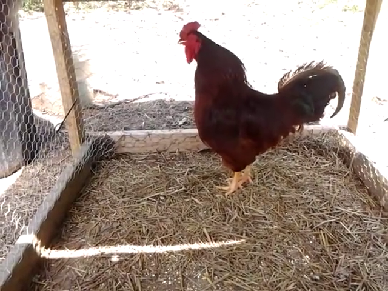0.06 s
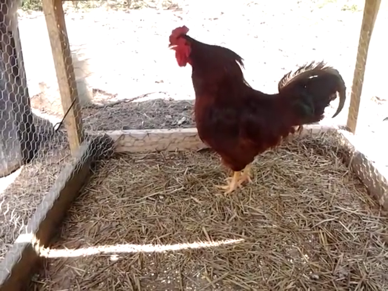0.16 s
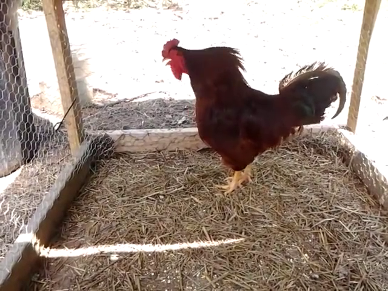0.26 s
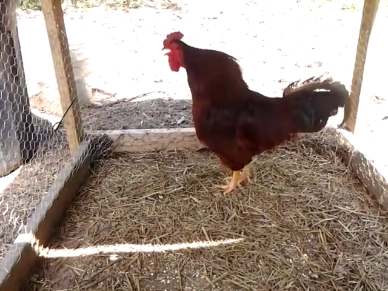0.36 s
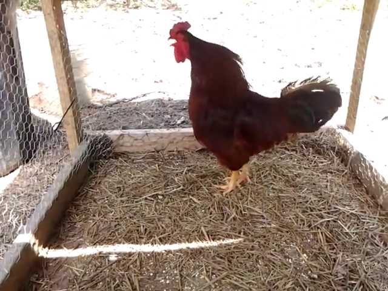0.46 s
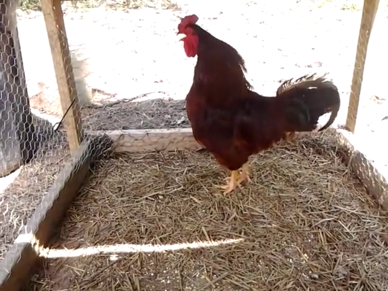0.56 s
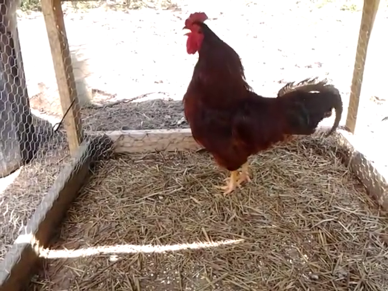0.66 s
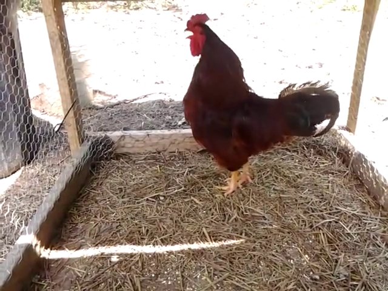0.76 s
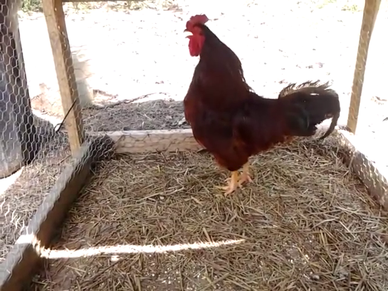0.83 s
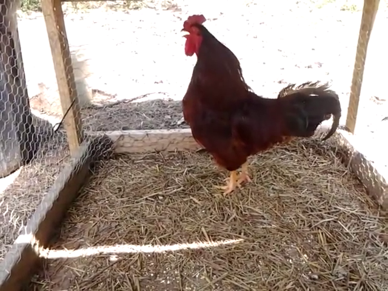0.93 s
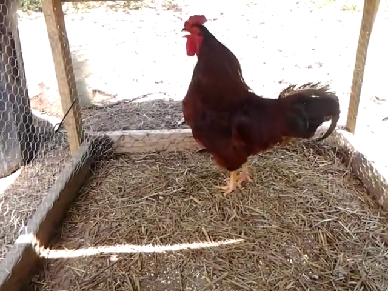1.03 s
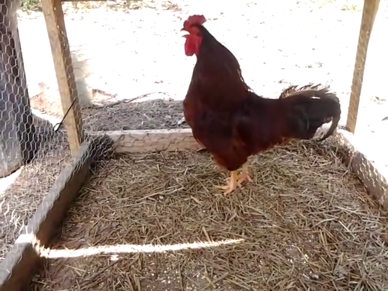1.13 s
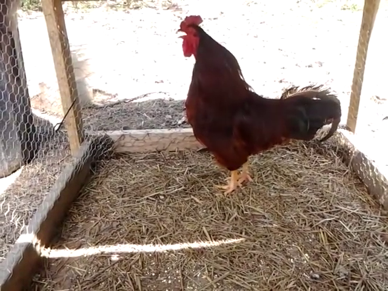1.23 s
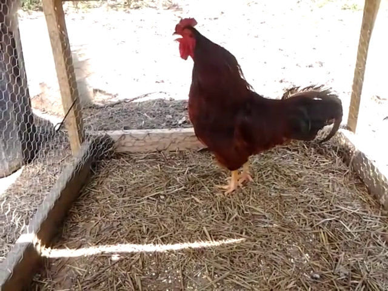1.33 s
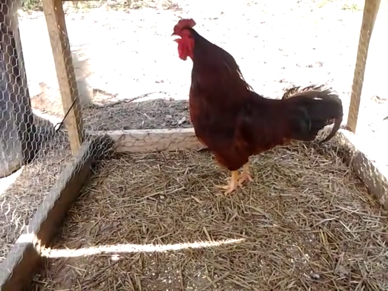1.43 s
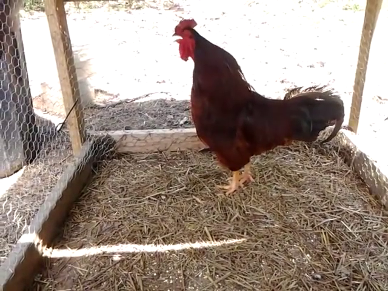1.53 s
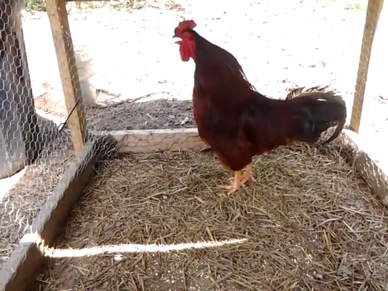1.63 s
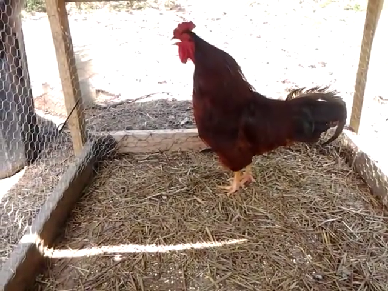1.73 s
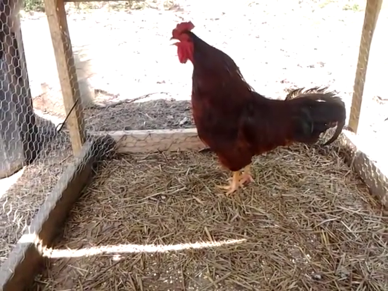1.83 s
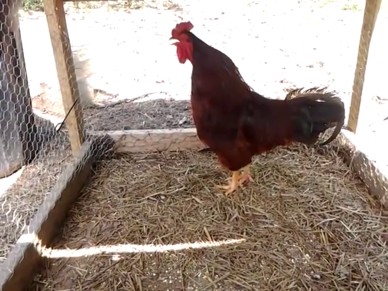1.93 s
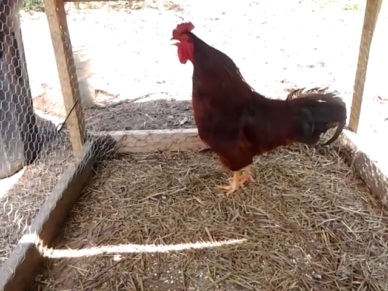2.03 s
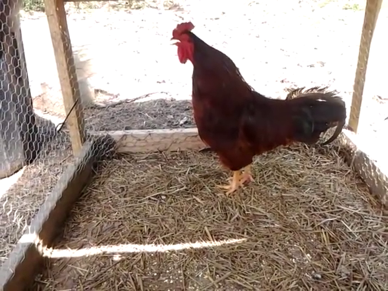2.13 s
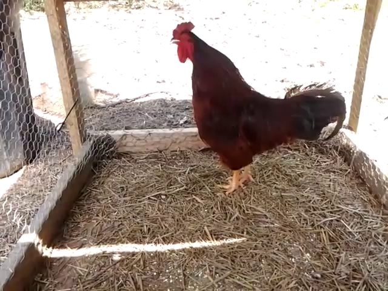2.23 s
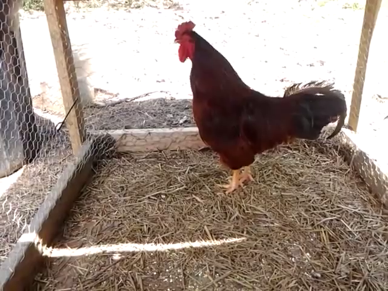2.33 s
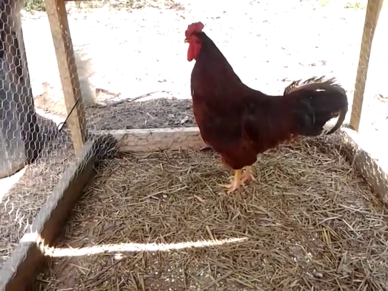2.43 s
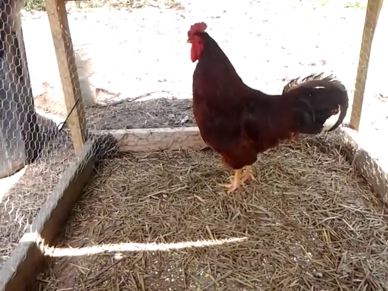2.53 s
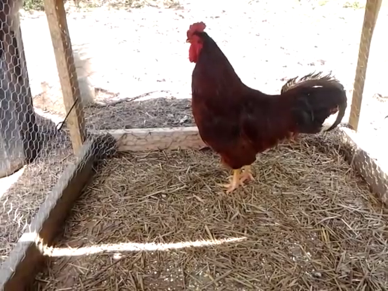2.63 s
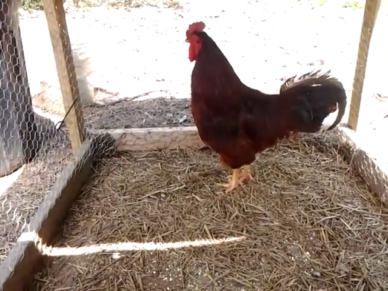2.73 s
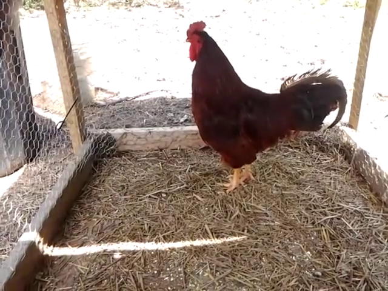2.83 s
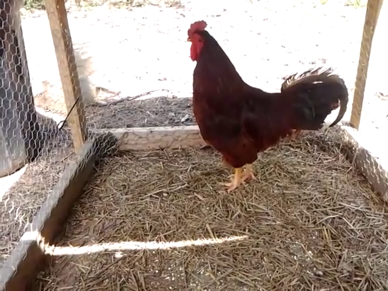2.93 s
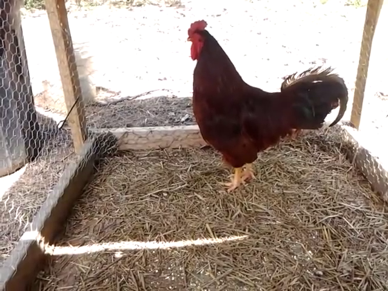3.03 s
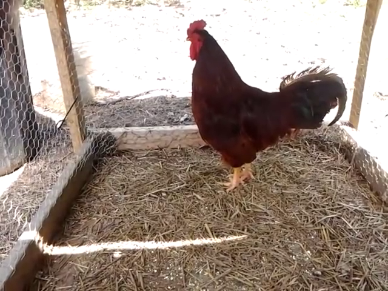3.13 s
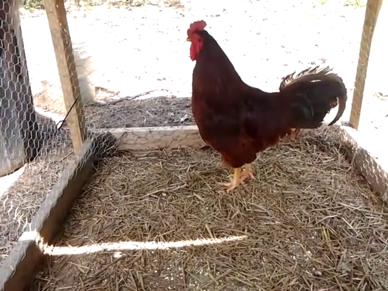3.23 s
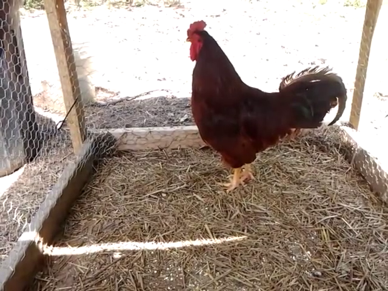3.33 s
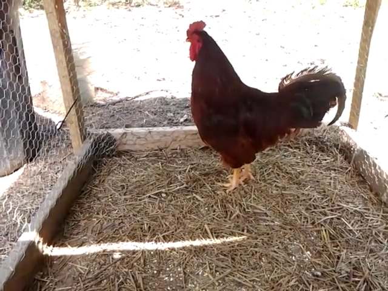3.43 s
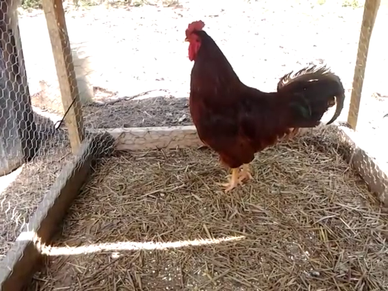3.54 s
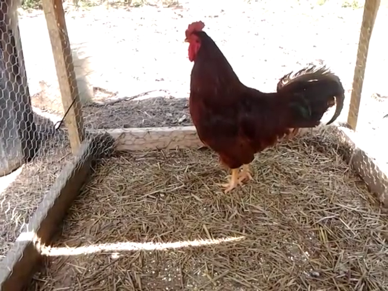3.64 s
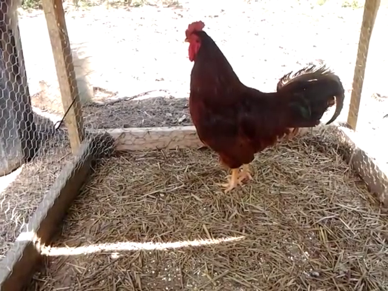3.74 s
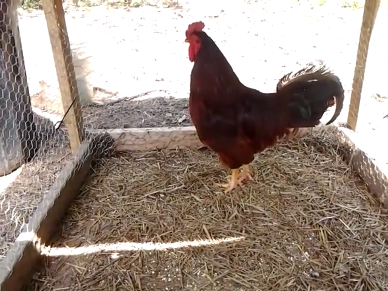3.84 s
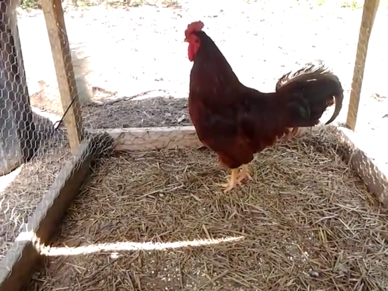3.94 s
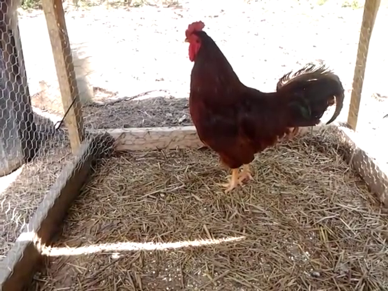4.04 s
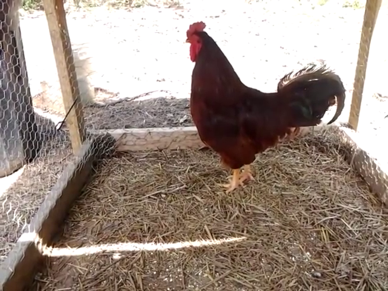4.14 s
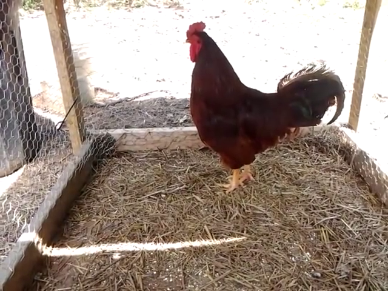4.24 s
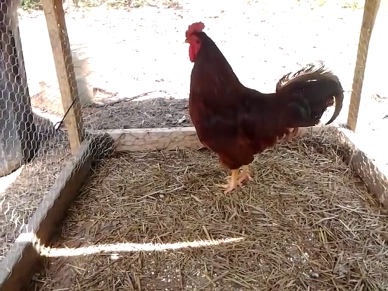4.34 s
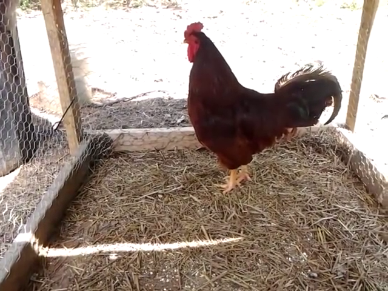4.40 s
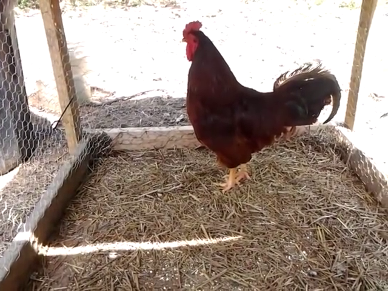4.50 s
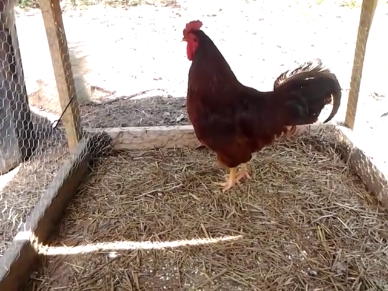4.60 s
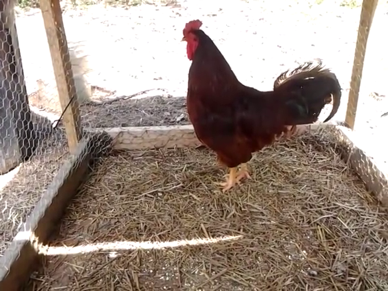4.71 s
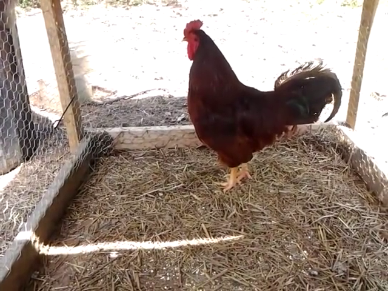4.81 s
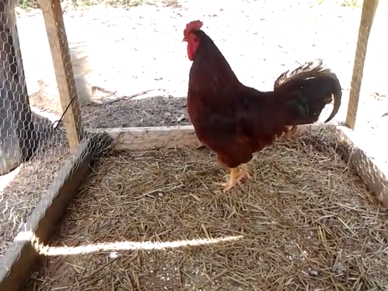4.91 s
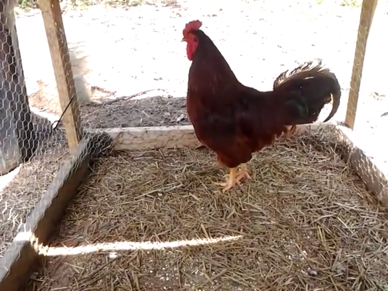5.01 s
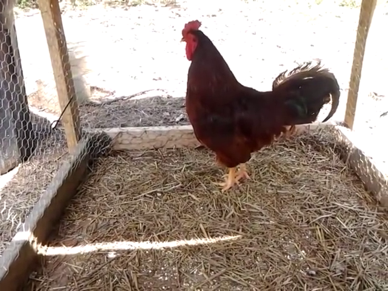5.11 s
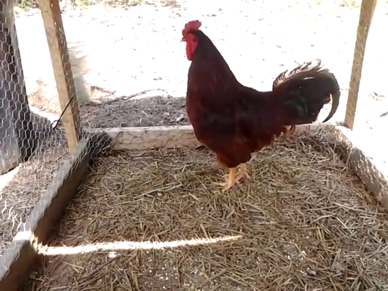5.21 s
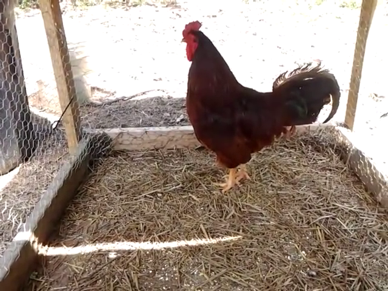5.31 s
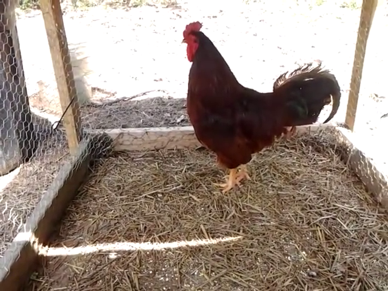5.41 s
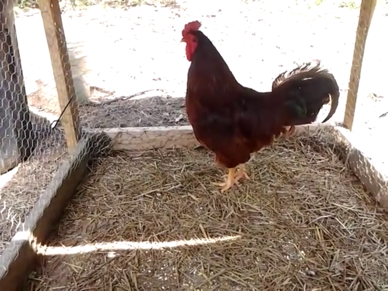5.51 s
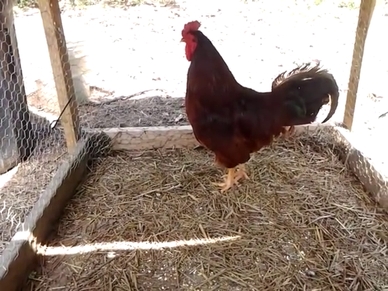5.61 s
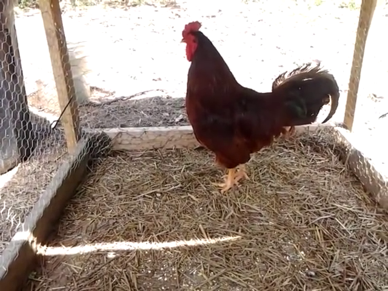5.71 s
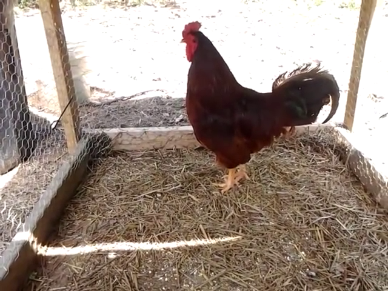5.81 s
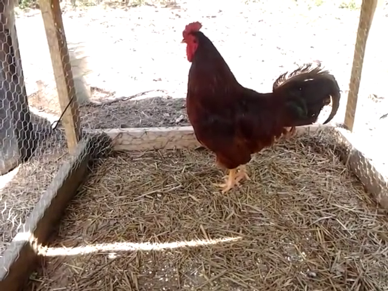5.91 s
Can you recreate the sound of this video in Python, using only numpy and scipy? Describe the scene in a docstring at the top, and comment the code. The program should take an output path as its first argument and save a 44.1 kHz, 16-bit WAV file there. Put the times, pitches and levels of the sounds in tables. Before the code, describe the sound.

Close, nearly dry outdoor pickup of a single rooster crow, cracking and raspy, with slight reflections from the wooden pen and yard. Straw ticks lead in; the crow fills the first two seconds or so. What remains is much quieter: airy hush with low rumble, thin bird chips, sliding whistles, buzzes and squeaks, occasional low clucks, and three distant nasal calls late on.

```python
"""Over outdoor hush, ticks of straw and a soft cluck lead into one close rooster crow, from pulses in a moving throat.
He crows a short note, a rising note, a fast warble and a long falling note, cracking between clean,
period-doubled and irregular vibration; filtered noise echoes make pen and yard ring faintly behind him.
Small birds, gliding near-sines, chip from the first note on, then whistle, buzz and squeak.
More soft clucks are scattered to the end, and late on a harmonic jay-like voice calls three times far off."""
import sys
import numpy as np
from scipy import signal
from scipy.fft import rfft, irfft
from scipy.io import wavfile
from scipy.ndimage import uniform_filter1d

SR = 44100
rng = np.random.default_rng(int(sys.argv[2]) if len(sys.argv) > 2 else 0)


def int16_out(signal):
    """Quantize to a 16-bit WAV file."""
    q = np.round(np.clip(np.atleast_2d(signal).T, -1, 1) * 32767)
    wavfile.write(sys.argv[1], SR, q.astype(np.int16))


N = 262836


def gain_of(db):
    """Decibels to a factor."""
    return 10 ** (np.asarray(db) / 20)


def evened(x):
    """Scales to an rms of one."""
    return x / np.sqrt(np.mean(x ** 2) + 1e-20)


def levelled(x):
    """Holds the short-time rms at one."""
    return x / np.sqrt(abs(uniform_filter1d(x ** 2, size=1365)) + 1e-12)


def eased(x, length_s):
    """Rounds the steps of a control."""
    return uniform_filter1d(x * 1., size=max(round(length_s * SR), 1))


def read(points, hz):
    """Reads a spectrum table on a log-frequency axis."""
    f, value = np.transpose(points)
    return np.interp(np.log(hz + 1), np.log(f + 1), value)


def follow(rows, t):
    """Reads each column of a curve table at the times t."""
    s, *columns = np.transpose(rows)
    return [np.interp(t, s, c) for c in columns]


def add(mix, s, sound):
    """Lays a sound into the mix at time s."""
    part = mix[max(round(s * SR), 0):][:len(sound)]
    part += sound[:len(part)]


def band(x, low_hz, high_hz):
    """A steep band-pass."""
    hz = np.fft.rfftfreq(2 * len(x), 1 / SR) + 0.000872  # the offset avoids dividing by zero
    spectrum = rfft(x, 2 * len(x))
    return irfft(spectrum / (1 + (low_hz / hz) ** 20) / (1 + (hz / high_hz) ** 20))[:len(x)]


def wobble(size, hz):
    """Smooth random drift, up to about hz, of rms one over the whole scene."""
    low_pass = signal.butter(2, hz, fs=SR, output="sos")
    return evened(signal.sosfilt(low_pass, rng.standard_normal(N)))[:size]


def resonate(x, modes, steep=1.38, size=4096):
    """A causal filter made of steep-sided resonances."""
    hz = abs(np.fft.fftfreq(size, 1 / SR))
    gain = sum(gain_of(db) / (1 + ((hz - f) / width * 1.82) ** 2) ** steep for f, width, db in modes)
    # the phase that belongs to this gain makes the ring start at once
    ring = np.fft.ifft(np.exp(signal.hilbert(np.log(gain + 1e-5)).conj())).real
    return signal.oaconvolve(x, ring[:size // 2])[:len(x)]


def echoes(x, decay, delay_s):
    """Scattered reflections: a noise tail in which each band dies at its own speed."""
    hz, t, z = signal.stft(rng.standard_normal(SR), SR, nperseg=256)
    fall = gain_of(-60 * t / read(decay, hz)[:, None])
    tail = signal.istft(z * fall, SR, nperseg=256)[1]
    out = np.zeros(N)
    add(out, delay_s, signal.fftconvolve(x, tail / np.linalg.norm(tail))[:N])
    return out


def glide(length, start_hz, end_hz, jitter, bend):
    """Phase and soft envelope of one gliding call."""
    size = max(round(length * SR), 64)
    hz = start_hz + (end_hz - start_hz) * np.linspace(0, 1, size) ** bend
    phase = 2 * np.pi * np.cumsum(hz * (1 + jitter * wobble(size, 200))) / SR
    return phase, signal.windows.tukey(size, .5)


# colour of the outdoor bed: (f/Hz, relative level/dB per Hz)
AIR = [(25, -23), (60, -18.5), (120, -9.5), (200, -6.5), (320, -8.5), (600, -10.5), (1300, -13.5),
       (2200, -13.5), (3900, -15.5), (5200, -18), (6500, -21), (8700, -10), (10800, -17), (17000, -13)]
AIR_DB = -57.5  # rms before the rumble's drift


def air():
    """Steady outdoor hush and microphone hiss from shaped noise; its low rumble drifts."""
    colour = gain_of(read(AIR, np.fft.rfftfreq(N, 1 / SR)))
    hush = evened(irfft(rfft(rng.standard_normal(N)) * colour, N))
    rumble = band(hush, 0, 400)
    return gain_of(AIR_DB) * (hush + 0.2027 * wobble(N, 4) * rumble)


# far harsh calls: (t/s, length/s, top f/Hz, level/dB before the distance trim)
JAY = [(4.305, .22, 828, -40), (5.057, 0.23, 826, -37), (5.759, 0.232, 839, -38.5)]
# their harmonic colour: (f/Hz, relative level/dB)
JAY_COLOUR = [(800, -18), (1600, 1.5), (2400, 5), (3200, 1.5), (4000, -5.5), (4900, -5), (5700, -30),
              (7500, -24), (9600, -7.5), (11000, -18)]


def jay(jitter=0.028, rasp=0.38, count=13):
    """A harsh nasal jay-like call of shaky harmonics: the pitch leaps up, then sinks."""
    out = np.zeros(N)
    for s, length, top_hz, db in JAY:
        u = np.linspace(0, 1, round(length * SR))
        arch = np.interp(u, [0, .2, 1], [.94, 1, .92])
        phase = 2 * np.pi * np.cumsum(top_hz * arch * (1 + jitter * wobble(len(u), 330))) / SR
        call = sum(gain_of(read(JAY_COLOUR, k * top_hz)) * np.sin(k * phase) for k in range(1, count + 1))
        swell = signal.windows.tukey(len(u), .4) * (1 + rasp * wobble(len(u), 190))
        add(out, s, gain_of(db) * evened(swell * call))
    return out


def chirp(length, start_hz, end_hz, db, rough):
    """One near-sine call; pitch jitter makes a rough one buzz."""
    phase, swell = glide(length, start_hz, end_hz, jitter=.1 * rough, bend=1.7)
    return gain_of(db) * evened(swell * np.sin(phase))


# All small-bird levels are rms before the distance trim.
# a small bird's falling chips: (t/s, length/s, top f/Hz, level/dB)
CHIPS = [(0.324, 0.051, 4030, -52), (2.357, .042, 4817, -56), (2.487, 0.033, 4760, -58),
         (2.614, 0.026, 4526, -56), (3.072, .041, 4840, -63), (3.423, 0.026, 4600, -63),
         (3.475, .035, 4750, -64.5), (3.609, 0.0209, 4500, -61.5), (3.672, 0.046, 4150, -65),
         (3.775, 0.04, 4540, -62), (4.186, .03, 4660, -60), (4.3, 0.027, 4710, -61)]
CHIP_FALL, CHIP_ROUGH = .75, 0.097  # end pitch as a share of the top; roughness 0-1
# fainter chips of its flock, at loosely spaced times; length and pitch are averages
FAINT_FROM_S, FAINT_TO_S, FAINT_S, FAINT_HZ, FAINT_DB = 2.9, 3.9, .045, 4250, -66
# two-note whistles, high then sliding down:
# (t/s, delay of second note/s, top f/Hz, first note level/dB, second note level/dB)
WHISTLES = [(2.358, 0.076, 2680, -51.5, -52.5), (2.695, .051, 2700, -54, -45.5),
            (2.993, .057, 2607, -52.5, -50.5)]
# first note's end, second note's start and end as shares of the top pitch
WHISTLE_SAG, WHISTLE_STEP, WHISTLE_END = .97, .83, .72
WHISTLE_S, WHISTLE_ROUGH = .056, 0.2  # length of each note; roughness 0-1
# buzzes: (t/s, level/dB)
BUZZES = [(2.462, -58), (4.418, -56.5)]
BUZZ_S, BUZZ_HZ, BUZZ_ROUGH = 0.14, 3580, 0.81
TONE_AFTER_S, TONE_HZ, TONE_DB = .058, 4175, -4.5  # a thin tone joins; level relative to the buzz
# level squeaks: (t/s, length/s, f/Hz, level/dB, roughness 0-1)
SQUEAKS = [(4.691, 0.089, 1960, -56.5, 0.58), (4.902, 0.036, 3030, -55.5, 0.39),
           (4.924, 0.032, 3990, -54.5, .18), (4.973, 0.019, 3920, -46, 0.85),
           (5.053, 0.029, 3155, -51.5, 0.07)]


def small_birds(count=4):
    """Small voices as gliding near-sines: falling chips, two-note whistles, buzzes and squeaks."""
    out = np.zeros(N)
    faint = []
    for k, (when, span, pitch) in enumerate(rng.random((count, 3))):
        s = FAINT_FROM_S + (FAINT_TO_S - FAINT_FROM_S) * (k + when) / count
        faint.append((s, FAINT_S * (.5 + span), FAINT_HZ * (1 + .2 * (pitch - .5)), FAINT_DB))
    for s, length, hz, db in CHIPS + faint:
        add(out, s, chirp(length, hz, hz * CHIP_FALL, db, CHIP_ROUGH))
    for s, delay, hz, first_db, second_db in WHISTLES:
        add(out, s, chirp(WHISTLE_S, hz, hz * WHISTLE_SAG, first_db, WHISTLE_ROUGH))
        second = chirp(WHISTLE_S, hz * WHISTLE_STEP, hz * WHISTLE_END, second_db, WHISTLE_ROUGH)
        add(out, s + delay, second)
    for s, db in BUZZES:
        add(out, s, chirp(BUZZ_S, BUZZ_HZ, BUZZ_HZ, db, BUZZ_ROUGH))
        add(out, s + TONE_AFTER_S, chirp(BUZZ_S, TONE_HZ, TONE_HZ, db + TONE_DB, CHIP_ROUGH))
    for s, length, hz, db, rough in SQUEAKS:
        add(out, s, chirp(length, hz, hz, db, rough))
    return out


# soft clucks: (t/s, length/s, start f/Hz, end f/Hz, rms level/dB)
CLUCKS = [(0.242, 0.041, 1195, 1040, -62.5), (2.584, 0.05, 786, 878, -56.5), (4.745, 0.057, 763, 817, -70),
          (5.498, 0.067, 766, 907, -65)]
# ticks of dry straw: (t/s, peak level/dB)
TICKS = [(0.1315, -45.5), (0.2493, -41.5), (0.267, -35.5), (0.2992, -34.5)]
# straw resonances: (f/Hz, nominal width/Hz, relative level/dB)
TICK_MODES = [(4000, 2700, -19.5), (9500, 820, -0.5), (11500, 3000, -14)]


def pen():
    """Clucks as short two-harmonic glides; straw underfoot as resonant noise ticks."""
    out = np.zeros(N)
    for s, length, start_hz, end_hz, db in CLUCKS:
        phase, swell = glide(length, start_hz, end_hz, jitter=.05, bend=1)
        add(out, s, gain_of(db) * evened(swell * (np.sin(phase) + .3 * np.sin(2 * phase))))
    t = np.arange(SR // 40) / SR
    for s, db in TICKS:
        burst = rng.standard_normal(len(t)) * gain_of(-60 * t / 0.01)  # falls 60 dB in 10 ms
        tick = resonate(burst, TICK_MODES)
        add(out, s, gain_of(db) * tick / abs(tick).max())
    return out


def pulse_train(phase, count=27):
    """Each pulse is spread over its cycle; the upper overtones swell and sink as the beak moves."""
    spread, drift_db, drift_hz = .19, 3.5, 6
    out = 0
    for k in range(1, count + 1):
        reach = np.clip((k - 2) / 6, 0, 1)  # the two lowest harmonics stay steady
        drift = gain_of(drift_db * reach * wobble(len(phase), drift_hz))
        out = out + drift * np.cos(k * phase - spread * k ** 2)
    return evened(out)


# fast warble of the syrinx in the third note; WARBLE_DIP_S times one of its dips
WARBLE_FROM_S, WARBLE_TO_S, WARBLE_RAMP_S = .915, 1.295, .03
WARBLE_HZ, WARBLE_DIP_S = 32.3, .942
WARBLE_DEPTH = .068  # scales the two parts of the pitch swing
# a rattle, faster than the warble but lower than the voice's pitch, shakes the pulses:
# rate, shift in cycles, pitch jitter
RATTLE_HZ, RATTLE_TURNS, RATTLE_JITTER = 169.2, .03, .12


def syrinx(t, hz, doubling, rough, jitter=0.079, shimmer=1.0, skew=0.038, crack=0.33, sag=.05, throb=0.37,
           waver=0.0017):
    """Pulses, alternately strong and weak when the period doubles, irregular when rough."""
    warbling = np.clip(np.minimum(t - WARBLE_FROM_S, WARBLE_TO_S - t) / WARBLE_RAMP_S, 0, 1)
    swing = 2 * np.pi * WARBLE_HZ * (t - WARBLE_DIP_S)
    # the voice cracks, sags and weakens near the bottom of each swing
    dip = warbling * ((1 + np.cos(swing)) / 2) ** 4
    rough = np.clip(rough + crack * dip, 0, 1)
    pitch_swing = WARBLE_DEPTH * warbling * (0.67 * np.cos(swing) + 0.32 * np.sin(swing))
    hz = hz * (1 - sag * dip - pitch_swing)
    unsteady = 1 + jitter * rough * wobble(len(t), 350) + waver * wobble(len(t), 42)
    turns = np.cumsum(hz * unsteady) / SR
    alternate = doubling * np.cos(np.pi * turns)
    rattle_turns = np.cumsum(RATTLE_HZ * (1 + RATTLE_JITTER * wobble(len(t), 200))) / SR
    rattle = warbling * np.sin(2 * np.pi * rattle_turns)
    # every other pulse also comes early
    phase = 2 * np.pi * (turns + skew * alternate + RATTLE_TURNS * rattle)
    pulses = pulse_train(phase) * (1 + 0.36 * alternate + shimmer * rough * wobble(len(t), 300))
    puffs = (1 + np.cos(phase)) * rng.standard_normal(len(t))  # air escapes once a cycle
    return (pulses * (1 - 0.71 * rough) + .5 * rough * puffs) * (1 - throb * dip)


# throat and beak resonances in four postures: (f/Hz, nominal width/Hz, relative level/dB)
THROAT_SHORT = [(550, 164, -9), (1113, 140, 0), (1336, 300, 1), (1745, 190, -2), (3000, 660, -28.5),
                (3920, 240, -12), (4800, 480, -17.5), (6220, 510, -16), (7200, 400, -24.5),
                (8160, 360, -11), (8630, 550, -13), (10260, 700, -29.5), (12800, 3000, -34),
                (15670, 2000, -46.5)]
THROAT_RAISED = [(750, 200, -1), (1162, 220, 2.5), (1466, 200, 1.5), (1722, 170, -2.5), (1910, 310, -2),
                 (3051, 380, -19.5), (4352, 250, -19.5), (5222, 430, -18.5), (6558, 260, -10.5),
                 (7726, 710, -13), (8340, 310, -14.5), (9906, 1100, -29), (12715, 1700, -29.5),
                 (15400, 1400, -32)]
THROAT_HELD = [(684.5, 280, -6.5), (1130, 250, -7.5), (1365, 160, 3.5), (1700, 530, -17), (2790, 80, -20.5),
               (4226, 670, -26), (4740, 200, -21), (5648, 320, -28.5), (6730, 520, -19), (7330, 300, -23.5),
               (8165, 250, -23), (9050, 530, -11), (10120, 570, -21), (11330, 790, -38), (14400, 4000, -44)]
THROAT_SINKING = [(626.4, 340, -4.5), (1130, 610, -8.5), (1362, 51, 2), (1702, 130, -6.5), (2750, 200, -16),
                  (3763, 250, -14), (4706, 150, -6), (5604, 210, -16.5), (6200, 250, -20.5),
                  (7520, 1800, -21.5), (8720, 600, -13), (9986, 500, -21), (12700, 1300, -37.5),
                  (14800, 2000, -38)]
# how the neck moves: (t/s, posture: 0 short, 1 raised, 2 held, 3 sinking)
POSTURE = [(.58, 0), (.62, 1), (1.29, 1), (1.35, 2), (1.84, 2), (2.02, 3)]


def throat(source):
    """Throat resonances colour the pulses, crossfading from one posture to the next."""
    posture, = follow(POSTURE, np.arange(len(source)) / SR)
    shapes = [THROAT_SHORT, THROAT_RAISED, THROAT_HELD, THROAT_SINKING]
    return sum(np.clip(1 - abs(posture - k), 0, 1) * resonate(source, modes) for k, modes in enumerate(shapes))


# the four notes: (start t/s, let go t/s, fade in dB/s, effort level/dB,
# fundamental level/dB and brightness level/dB relative to effort, brightening in dB/s,
# period doubling 0-1, roughness 0-1, length of the opening catch/s, its added roughness 0-1)
NOTES = [(0.36, 0.506, 472, -9, -11, -4.5, -11.5, .01, 0.056, .058, .75),
         (0.673, 0.843, 261, -8.5, -1.5, -13, 60, 0.078, 0.033, .016, .05),
         (.895, 1.326, 40.4, -12.5, -1.5, -7.5, -6.5, 0.38, 0.095, 0.00075, 0.036),
         (1.327, 2.256, 518.7, -8, -9, -12.5, 3, 0.039, .025, 0.00091, 0)]
# basic pitch of each note, before slackening and warble: (t/s, f/Hz)
SHORT_PITCH = [(.43, 666), (.475, 684), (.55, 664)]
RISING_PITCH = [(0.694, 710), (.731, 744.6), (.74, 812), (.795, 853.4), (0.803, 952.4), (0.842, 973),
                (0.859, 833.8), (0.891, 785.7)]
WARBLING_PITCH = [(.897, 667.6), (.93, 758), (1.081, 774.5), (1.258, 768), (1.288, 822), (1.316, 806.5)]
HELD_PITCH = [(1.338, 700.3), (1.384, 713), (1.438, 702.6), (1.454, 687.6), (1.464, 699.8), (1.752, 680.2),
              (1.992, 656.1), (2.002, 646), (2.165, 628.3)]
# cracks of the voice: (t/s, length/s, added doubling 0-1, added roughness 0-1,
# middle register (mainly the second harmonic) level change/dB, fundamental level change/dB)
CRACKS = [(0.416, 0.0074, 0.1, 0.2, -9.5, -3), (0.731, 0.055, .05, 0.19, -4, 0),
          (0.778, 0.03, 0, 0.07, -4, -7.5), (0.798, 0.098, 0.02, 0.14, 0.5, -5),
          (0.892, .024, 0, .08, -3.5, 4.5), (1.283, .048, .6, 0.13, -4.5, -0.5),
          (1.337, .065, 0, 0.02, -7.5, 2.5), (1.399, 0.13, 0.32, .03, 0, 1.5),
          (2.176, 0.089, 0.18, 0.22, -0.5, -1), (2.239, 0.049, .1, 0.08, 0.5, 4)]
# treble level change, mostly along the long note: (t/s, level/dB)
TREBLE = [(1.33, 0.5), (1.39, 2), (1.5, -2.5), (1.68, 3), (1.8, -0.5), (2, 1), (2.22, 1)]
ATTACK_S, SWITCH_S = 0.0061, .01  # a note swells in; the syrinx flips from one kind of vibration to another
# at the catch and after letting go the syrinx is slack: lower, period-doubled and rough
SLACK_PITCH, SLACK_DOUBLING, SLACK_DB = .85, 0.42, -1.5
FADE_ROUGH, FADE_DULL_DB = .45, -9
# above this pitch the fundamental leaves the throat's lowest resonance
LEAVE_HZ, LEAVE_DB_PER_HZ = 817, -0.08
# late in the long note he tires: the middle register drops and a period-doubled rasp grows
TIRE_AT_S, TIRE_DROP_S, TIRE_MIDDLE_DB = 1.955, 0.037, -7
TIRE_GROW_S, TIRE_DOUBLING = 0.13, 0.55


def gesture(t):
    """Pitch, doubling, roughness and three register gains, from the notes, their cracks and his tiring."""
    which = np.maximum(np.searchsorted([row[0] for row in NOTES], t) - 1, 0)
    (start, stop, fade, effort_db, fundamental_db, bright_db, brightening,
     doubling, rough, catch_s, catch_rough) = np.array(NOTES)[which].T
    catch = eased(t < start + catch_s, SWITCH_S)
    fading = eased(t > stop, SWITCH_S)
    slack = np.minimum(catch + fading, 1)
    tired_s = np.maximum(t - TIRE_AT_S, 0)
    crack_doubling, crack_rough, crack_middle_db, crack_fundamental_db = sum(
        np.outer(change, eased((t > s) & (t < s + length), SWITCH_S)) for s, length, *change in CRACKS)

    hz, = follow(SHORT_PITCH + RISING_PITCH + WARBLING_PITCH + HELD_PITCH, t)
    hz = hz * (1 + (SLACK_PITCH - 1) * slack)
    rasp = TIRE_DOUBLING * np.minimum(tired_s / TIRE_GROW_S, 1)
    doubling = (1 - slack) * (doubling + rasp) + slack * SLACK_DOUBLING + crack_doubling
    rough = rough + catch * catch_rough + fading * FADE_ROUGH + crack_rough

    level_db = effort_db + SLACK_DB * slack - fade * np.maximum(t - stop, 0)
    leave_db = LEAVE_DB_PER_HZ * np.maximum(hz - LEAVE_HZ, 0)
    low_db = fundamental_db + leave_db + crack_fundamental_db
    tired_db = TIRE_MIDDLE_DB * np.minimum(tired_s / TIRE_DROP_S, 1)
    middle_db = tired_db * (1 - fading) + crack_middle_db
    high_db = bright_db + brightening * (t - start) + FADE_DULL_DB * fading + follow(TREBLE, t)[0]
    gains = [eased((t > start) * gain_of(level_db + db), ATTACK_S) for db in (low_db, middle_db, high_db)]
    return hz, np.clip(doubling, 0, 1), rough, gains


def rooster():
    """Four notes from one voice, levelled in three registers: fundamental, mainly second harmonic, treble."""
    t, out = np.arange(N // 2) / SR, np.zeros(N)
    hz, doubling, rough, gains = gesture(t)
    voice = throat(syrinx(t, hz, doubling, rough))
    for gain, edges_hz in zip(gains, [(150, 1000), (1000, 2400), (2400, 18000)]):
        add(out, 0, gain * levelled(band(voice, *edges_hz)))
    return out


# how long the yard rings: (f/Hz, 60 dB decay time/s)
YARD = [(300, 0.55), (700, .6), (1300, 1), (2500, 1.4), (4500, 0.42), (9000, 0.85), (16000, 0.13)]


def scene():
    """The near rooster is almost dry; the far birds are wet with the yard's echo."""
    near = rooster() + pen()
    far = gain_of(-4.5) * small_birds() + gain_of(-13.0) * jay()
    # boards and posts of the pen
    frame = gain_of(-9) * echoes(near, [(500, 0.071), (9000, 0.11)], delay_s=.004)
    near_yard = gain_of(-33.5) * echoes(near, YARD, delay_s=0.056)
    far_yard = gain_of(-7.0) * echoes(far, YARD, delay_s=0.01)
    return (near + frame + far + near_yard + far_yard + air())[None]


EDGE_HZ = 17080  # upper band limit


def record(dry, ceiling=0.95):
    """The microphone clips any peak beyond its ceiling; then a steep low-pass sets the band limit."""
    clipped = np.clip(dry, -ceiling, ceiling)
    low_pass = signal.firwin(511, EDGE_HZ, window=("kaiser", 9), fs=SR)
    return signal.oaconvolve(clipped, low_pass[None], "same")


dry = scene()
out = record(dry)
int16_out(out)
```